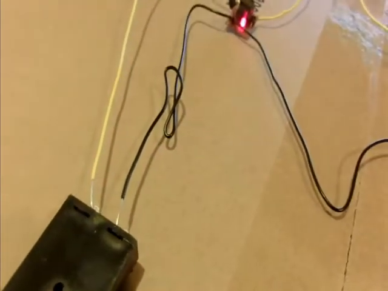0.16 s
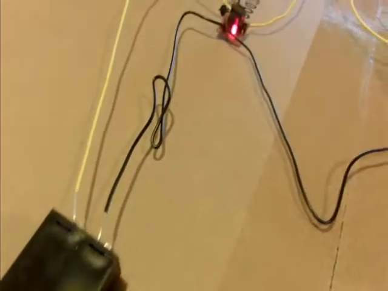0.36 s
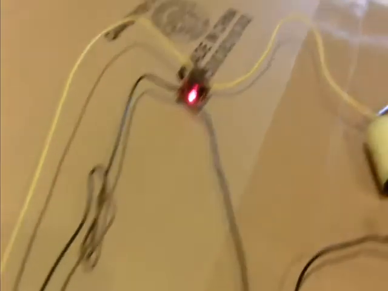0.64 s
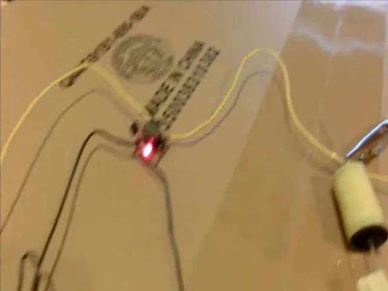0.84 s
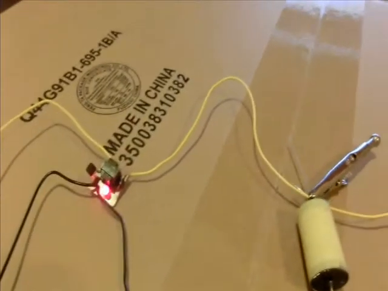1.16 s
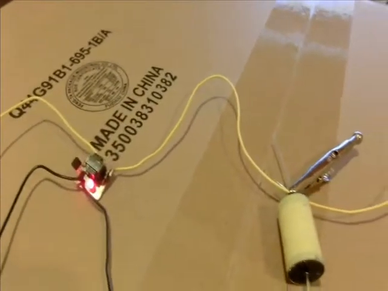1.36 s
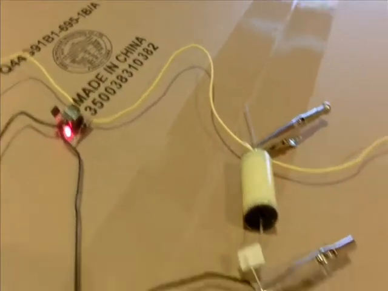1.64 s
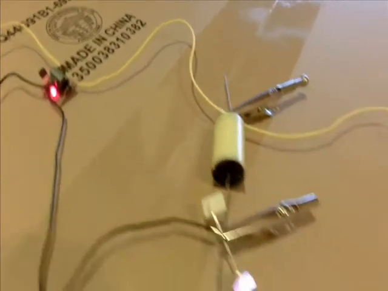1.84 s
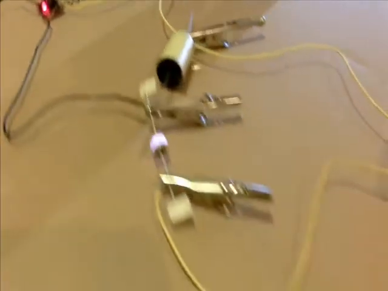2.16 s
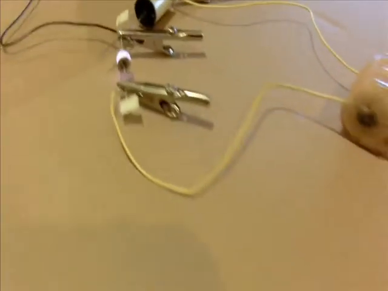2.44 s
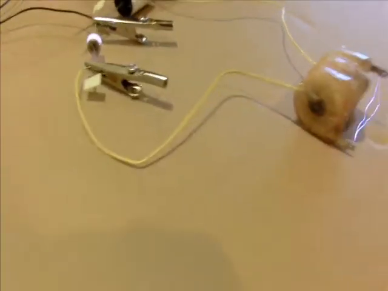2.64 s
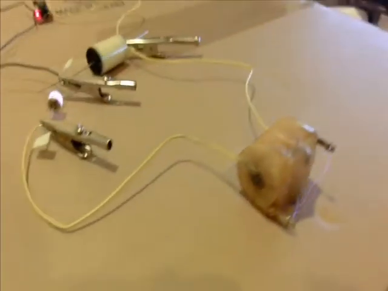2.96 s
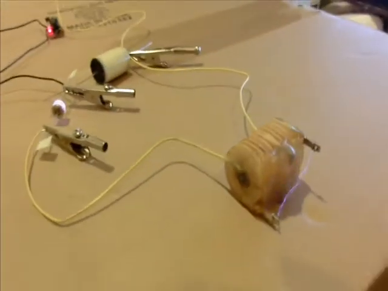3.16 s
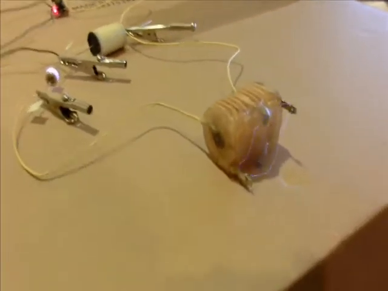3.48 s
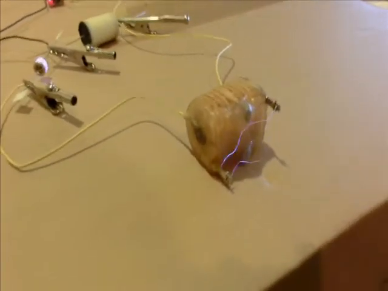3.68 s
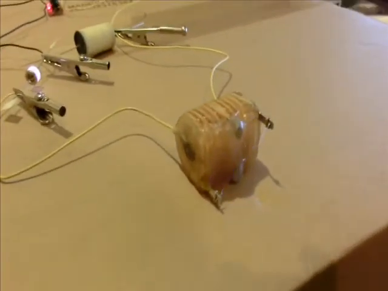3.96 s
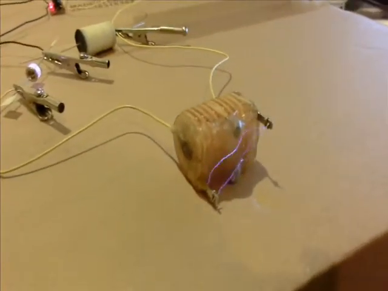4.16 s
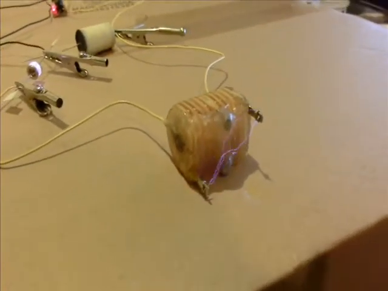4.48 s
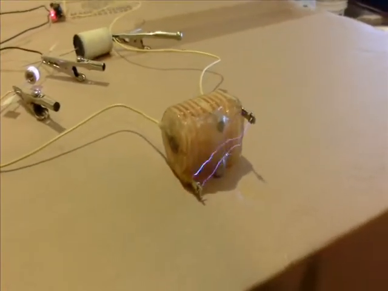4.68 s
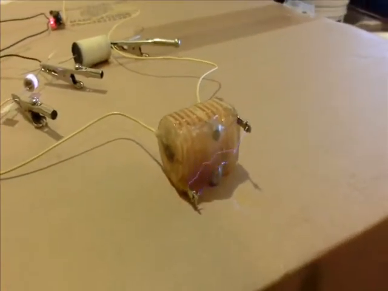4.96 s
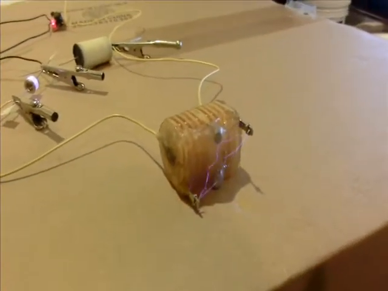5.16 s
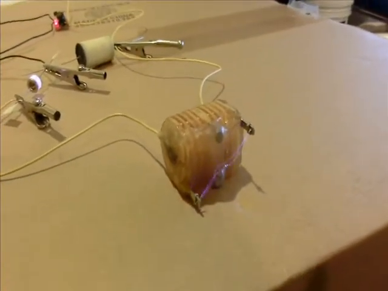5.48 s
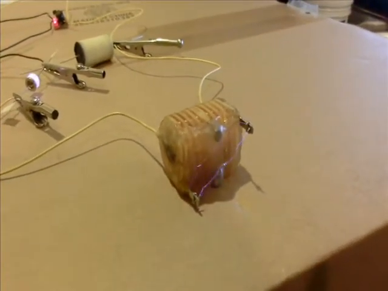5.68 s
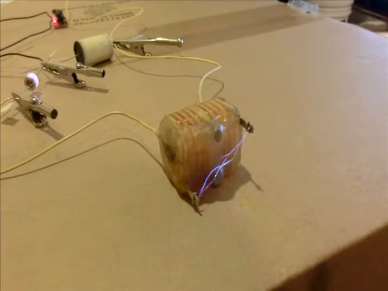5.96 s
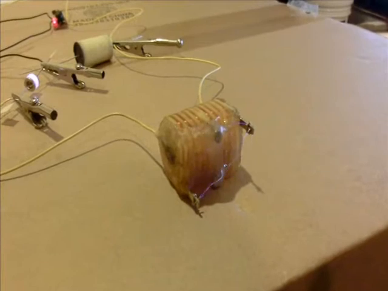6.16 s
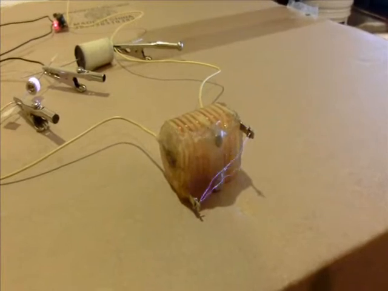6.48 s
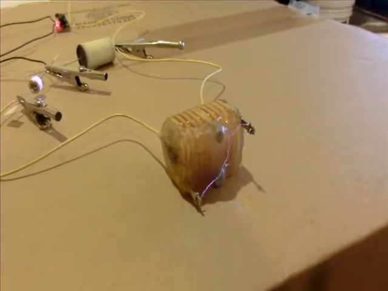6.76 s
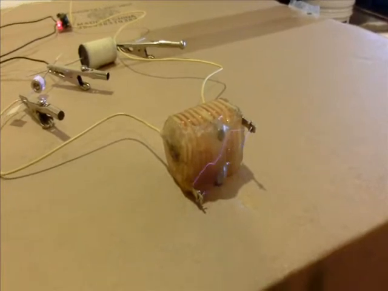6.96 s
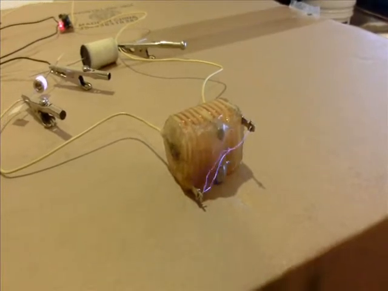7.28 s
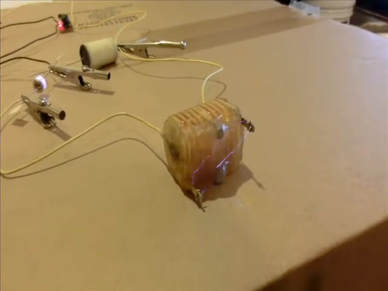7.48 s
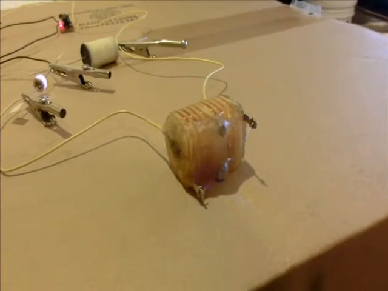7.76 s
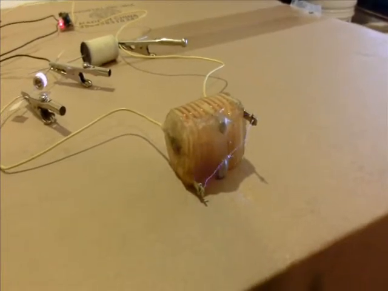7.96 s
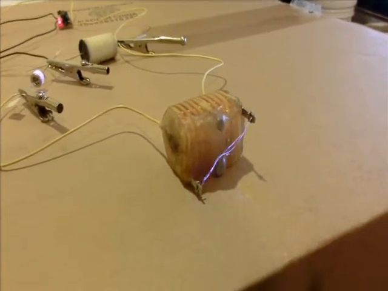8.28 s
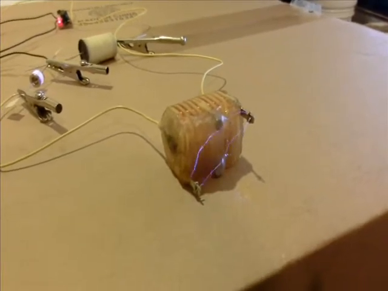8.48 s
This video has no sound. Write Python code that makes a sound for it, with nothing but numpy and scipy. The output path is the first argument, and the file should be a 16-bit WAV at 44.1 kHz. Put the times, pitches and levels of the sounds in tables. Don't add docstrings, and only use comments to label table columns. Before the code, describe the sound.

Handheld stereo phone close to a tabletop high-voltage circuit. From the first instant an electric arc rattles at roughly 110 cracks per second, coarse and loud with short reflections off hard walls. As the phone swings past the gap at about two seconds it grows momentarily stronger, then crisper and less echoey facing the coil. The buzz sags to around 94 per second, roughened by faltering sparks, stronger arcs and sharp snaps, and stops abruptly, still running.

```python
import sys
import numpy as np
from scipy import signal
from scipy.fft import rfft, irfft
from scipy.io import wavfile
from scipy.ndimage import uniform_filter1d

SR = 44100
rng = np.random.default_rng(int(sys.argv[2]) if len(sys.argv) > 2 else 0)


def store_pcm(level_fs):
    pcm = np.round(np.clip(level_fs, -1, 1) * 32767).astype(np.int16)
    wavfile.write(sys.argv[1], SR, np.atleast_2d(pcm).T)


def voltage_ratio(level):
    return 10 ** (np.asarray(level, float) / 20)


N = 380141

THUD_FOLLOWS = 0.3


def butter_filter(x, order, hz, kind):
    return signal.sosfilt(signal.butter(order, hz, kind, fs=SR, output="sos"), x)


def coloured(x, table, column):
    rows, size = np.array(table), 2048
    hz = np.maximum(np.arange(size // 2 + 1) * SR / size, 1)
    level_db = np.interp(np.log(hz), np.log(rows[:, 0]), rows[:, column])
    cepstrum = irfft(np.log(voltage_ratio(level_db)))
    cepstrum[1:size // 2] *= 2
    cepstrum[size // 2 + 1:] = 0
    return signal.oaconvolve(x, irfft(np.exp(rfft(cepstrum))))[:N]


def clicks(times, sizes):
    at = np.ravel(times)[:, None] * SR
    taps = np.floor(at).astype(int) + np.arange(-8, 9)
    shape = np.sinc(taps - at) * np.cos(np.pi * (taps - at) / 18) ** 2
    pulses = np.ravel(sizes)[:, None] * shape
    return np.bincount(np.clip(taps, 0, N).ravel(), pulses.ravel(), N + 1)[:N]


def dying_noise(train, t60_s):
    keep = voltage_ratio(-120 / (t60_s * SR))
    start = [np.mean(train[:SR // 10] ** 2) * keep]
    power = signal.lfilter([1 - keep], [1, -keep], train ** 2, zi=start)[0]
    return np.sqrt(power) * rng.standard_normal(N)


def room_floor():
    rumble = butter_filter(rng.standard_normal((2, N)), 2, [20, 220], "band")
    murmur = butter_filter(rng.standard_normal((2, N)), 2, [150, 600], "band")
    rumble = voltage_ratio(-74) * rumble / rumble.std() * voltage_ratio([[-5], [3]])
    return rumble + voltage_ratio(-66.5) * murmur / murmur.std()


def pickup(times, sizes):
    luck = np.clip(rng.standard_normal((len(times), 2)), -2.5, 2.5)
    even_sizes = sizes ** THUD_FOLLOWS
    jolt_sizes = even_sizes * voltage_ratio(-11.5 + 0.09 * times)
    left_luck = voltage_ratio(-27) * (0.18 * luck[:, 0] + luck[:, 1])
    jolts = [clicks(times - 0.0003, jolt_sizes * side) for side in (left_luck, luck[:, 0])]
    pull_late_s = -0.00013
    pull = clicks(times + pull_late_s, -even_sizes * voltage_ratio(-14 - times))
    pull = butter_filter(pull, 2, 750, "low") * voltage_ratio([[-5], [0]])
    return butter_filter(jolts, 2, 2110, "low") + pull


def room(train):
    t60_s, walls_share = 0.19, 0.42
    walls = rng.standard_normal(SR // 4) * voltage_ratio(-60 * np.arange(SR // 4) / SR / t60_s)
    walls[:SR // 300] = 0
    walls /= np.sqrt(np.sum(walls ** 2))
    lead_in = round(45 / RHYTHM[0][1] * SR)
    alike = signal.oaconvolve(np.r_[train[:lead_in], train], walls)[lead_in:lead_in + N]
    alike = butter_filter(alike, 2, 1300, "high")
    return np.sqrt(walls_share) * alike + np.sqrt(1 - walls_share) * dying_noise(train, t60_s)


# pitch_hz, left_db, right_db
ROOM_COLOUR = [(150, -47, -57), (400, -11, -2), (700, -6, -6.5), (1000, -16, -13.5), (1460, -13.5, -18),
               (2050, -12, -11.5), (2640, -16, -9), (3670, -17.5, -9), (4800, -17, -9.5),
               (5400, -12, -13.5), (6360, -11.5, -10.5), (7700, -12, -8), (8500, -16, -8),
               (10000, -28, -6.5), (11200, -27, -8), (12500, -24, -8.5), (14000, -24, -13),
               (14800, -40, -11), (15400, -48, -23), (16600, -60, -12)]


def room_tail(side, times, sizes):
    tail = coloured(room(clicks(times, sizes)), ROOM_COLOUR, side + 1)
    return butter_filter(tail, 2, 900, "high")


def smear(train, level_db):
    width_s = 0.0048
    bell = np.hanning(int(width_s * SR) + 3) ** 2
    power = np.convolve(train ** 2, bell / bell.sum(), "same")
    return voltage_ratio(level_db) * np.sqrt(power) * rng.standard_normal(N)


def clutter(side, crack):
    scatter = voltage_ratio(-12) * dying_noise(crack, 0.02) + smear(crack, (0, -8.5)[side])
    return butter_filter(scatter, 2, (2800, 2600)[side], "high")


# delay_side_on_ms, delay_facing_ms, left_db, right_db, fade_db_per_pose_step
MIRRORS = [(.9, 1.3, -13, -7, -5), (1.55, 2.3, -16, -9, -6), (2.95, 3.06, -17, -6.5, -3.5),
           (7.5, 7.8, -20, -8, -5.5)]


def mirrored(side, times, sizes, pose):
    echoes = np.zeros(N)
    for side_on_ms, facing_ms, *level_db, fade_db in MIRRORS:
        delay_s = (side_on_ms + (facing_ms - side_on_ms) * pose / 2) / 1000
        echoes += clicks(times + delay_s, sizes * voltage_ratio(level_db[side] + fade_db * pose))
    return echoes


# time_s, pose (0 side-on, 1 passing, 2 facing), direct_db, room_db
PHONE_PATH = [(0, 0.045, 4, 1.5), (0.7, 0.05, 4.5, 0.5), (1.2, 0.056, 6, 0.5), (1.7, 0.14, 4.5, -1.5),
              (2.05, 0.23, 4, -3), (2.2, 0.65, 8.5, -2), (2.6, 1.11, 6.5, -6.5), (3.1, 1.36, 4, -9.5),
              (3.4, 1.63, 0.5, -10.5), (3.9, 1.85, -2.5, -12), (4.4, 2, -2, -9.5), (5.3, 1.93, -2.5, -12),
              (6.2, 1.89, -3, -12), (7.4, 2.13, -3.5, -13.5), (8.62, 2.2, -3, -13.5)]


def heard_by(side, mic, lag_ms, times, sizes, evened):
    path_s, *columns = np.transpose(PHONE_PATH)
    pose, direct_db, room_db = [np.interp(times, path_s, column) for column in columns]
    pose = np.clip(pose, 0, 2)
    times = times + lag_ms / 1000
    near = np.zeros(N)
    for k in range(3):
        share = np.clip(1 - np.abs(pose - k), 0, 1) * sizes * voltage_ratio(direct_db)
        crack = clicks(times, share)
        thud = signal.lfilter(*signal.butter(1, 2600, fs=SR), clicks(times, share * (evened - 1)))
        sound = crack + thud + clutter(side, crack) + mirrored(side, times, share, pose)
        near += coloured(sound, mic, k + 1)
    notch_hz, notch_width_hz = 12500, 300
    notched = signal.lfilter(*signal.iirnotch(notch_hz, notch_hz / notch_width_hz, SR), near)
    near += 0.65 * (notched - near)
    return near + room_tail(side, times, sizes * voltage_ratio(room_db + 7))


def long_port(x, hz, width_hz):
    r = np.exp(-np.pi * width_hz / SR)
    poles = [1, -2 * r * np.cos(2 * np.pi * hz / SR), r * r]
    return signal.lfilter(poles[::-1], poles, x)


# pitch_hz, side_on_db, passing_db, facing_db
LEFT_COLOUR = [(89, -19, -25, -21), (525, -14.5, -21, -19.5), (580, -9, -13.5, -9.5),
               (702, -10, -14.5, -12.5), (805, -2, -18, -14), (854, -0.5, -8, -6.5), (1010, -7, -13, -4.5),
               (1136, -4.5, -13.5, -4.5), (1350, -9, -15.5, -9.5), (2020, -3.5, -10.5, -7),
               (2710, -11.5, -14, -10.5), (3780, -19.5, -18.5, -27), (4900, -23, -7.5, -2.5),
               (5340, -29, -13, -14.5), (5770, -21, -24, 0.5), (6440, -13, -22, -4.5),
               (7060, -14, -10, -10), (8700, -16, -22, -8.5), (10000, -15.5, -15, -12),
               (11300, -15, -23, -12), (12500, -20, -16, -10.5), (13900, -30, -23, -17.5),
               (15000, -42, -38, -19), (16300, -62, -64, -25)]


def left_microphone(cluster, evened):
    sound = heard_by(0, LEFT_COLOUR, -0.31, *cluster, evened)
    sound = signal.lfilter(*signal.butter(2, 594, "high", fs=SR), sound)
    return long_port(sound, hz=1575, width_hz=2180)


# pitch_hz, side_on_db, passing_db, facing_db
RIGHT_COLOUR = [(101, -77, -75, -52), (360, -26, -30, -25), (840, -16.5, -33, -30), (1460, -19.5, -35, -15),
                (1880, -16.5, -13.5, -14), (2260, -6.5, -17, -8), (3240, -8.5, -13, -5),
                (3920, -8, -8.5, 0), (4500, -16.5, -5, -1.5), (5230, -13.5, -9.5, -1), (5400, -14, -6, -2),
                (5770, -10.5, -8.5, -6), (6360, -8, -10.5, -2.5), (7800, -10.5, -16, -5),
                (9360, -9.5, -10, -6), (10870, -7, -5.5, 2.5), (12400, -5.5, -6.5, 4),
                (13400, -8, -6.5, 3.5), (15100, -8, -9, 3.5), (15500, -22, -18, -5), (15850, -50, -38, -20),
                (16550, -70, -60, -28)]


def right_microphone(cluster, evened):
    sound = heard_by(1, RIGHT_COLOUR, -0.26, *cluster, evened)
    return long_port(sound, hz=2156, width_hz=1870)


def arc(times, sizes, length_ms, kink_db, count=4):
    luck = rng.random((len(times), 2, count))
    trailing = np.arange(count) > 0
    lags_s = length_ms / 1000 * luck[:, 0] * trailing
    shares = voltage_ratio((kink_db - 12 * luck[:, 1]) * trailing)
    shares = shares / np.sqrt(np.sum(shares ** 1, axis=1, keepdims=True))
    return times[:, None] + lags_s, sizes[:, None] * shares


# time_s, sparks_per_s
RHYTHM = [(0.0, 109.49), (0.146, 108.43), (0.292, 108.99), (0.438, 109.9), (0.584, 108.63), (0.731, 107.39),
          (0.877, 106.9), (1.023, 107.08), (1.169, 105.98), (1.315, 105.45), (1.461, 106.14),
          (1.607, 103.93), (1.753, 103.91), (1.899, 105.04), (2.045, 103.72), (2.192, 103.45),
          (2.338, 103.6), (2.484, 103.45), (2.63, 101.39), (2.776, 102.92), (2.922, 104.1), (3.068, 100.51),
          (3.214, 102.2), (3.36, 101.21), (3.506, 101.73), (3.653, 100.23), (3.799, 99.79), (3.945, 100.48),
          (4.091, 100.11), (4.237, 100.42), (4.383, 99.66), (4.529, 97.9), (4.675, 99.39), (4.821, 98.47),
          (4.967, 97.5), (5.114, 99.21), (5.26, 97.49), (5.406, 97.77), (5.552, 97.92), (5.698, 97.78),
          (5.844, 98.06), (5.99, 98.38), (6.136, 97.13), (6.282, 97.4), (6.428, 95.74), (6.575, 96.49),
          (6.721, 94.79), (6.867, 95.76), (7.013, 96.46), (7.159, 97.49), (7.305, 95.77), (7.451, 96.43),
          (7.597, 95.82), (7.743, 97.66), (7.889, 95.72), (8.036, 96.89), (8.182, 95.04), (8.328, 94.55),
          (8.474, 95.84), (8.62, 93.83)]
# time_s, level_db (against the usual spark)
ODD_SPARKS = [(0.207, -5.5), (0.305, -5.5), (0.334, -6.0), (0.39, -6.5), (0.665, -6.0), (1.526, -5.0),
              (2.076, -5.0), (2.384, -7.0), (2.716, -7.0), (2.794, -6.0), (2.813, -5.0), (3.007, -6.5),
              (3.036, -5.5), (3.066, -6.0), (3.076, -5.0), (3.4, -5.5), (3.41, -5.5), (3.5, -5.0),
              (3.948, -5.0), (3.968, -8.0), (4.107, -8.5), (4.127, -6.0), (4.691, -5.0), (4.751, -6.5),
              (4.893, -6.0), (4.914, -6.0), (4.975, -6.0), (5.026, -8.5), (5.087, -5.5), (5.239, -6.0),
              (5.3, -6.5), (5.311, -5.5), (5.372, -7.0), (5.781, -5.0), (5.935, -7.0), (5.945, -6.0),
              (6.159, -8.5), (6.231, -5.0), (6.293, -5.5), (6.49, -5.5), (6.594, -5.0), (6.604, -11.0),
              (6.793, -5.0), (6.887, -5.5), (6.898, -6.5), (6.96, -6.5), (6.991, -6.0), (7.064, -5.5),
              (7.074, -5.0), (7.187, -6.5), (7.571, -6.0), (7.686, -5.0), (7.83, -7.0), (7.84, -10.0),
              (7.944, -6.0), (7.996, -5.0), (8.027, -6.0), (8.111, -6.5), (8.353, -6.0), (8.415, -10.0),
              (0.114, 2.5), (0.298, 2.5), (0.417, 2.5), (0.563, 2.0), (0.59, 2.5), (0.757, 3.0),
             (0.785, 2.5), (0.823, 2.0), (1.443, 2.0), (1.5, 2.0), (1.557, 2.5), (1.595, 2.5), (1.931, 2.5),
             (2.066, 2.5), (2.085, 2.0), (2.336, 2.5), (2.5, 2.5), (2.559, 3.0), (2.774, 2.5), (2.861, 2.5),
             (2.91, 2.5), (3.125, 2.0), (3.203, 2.0), (3.381, 2.5), (3.46, 2.0), (3.588, 2.0), (3.627, 2.0),
             (3.688, 2.0), (3.758, 2.5), (3.787, 2.5), (3.918, 3.0), (3.997, 2.0), (4.017, 3.0),
             (4.227, 3.0), (4.246, 2.5), (4.346, 2.0), (4.579, 2.5), (4.65, 2.0), (4.883, 2.5), (5.75, 3.0),
             (5.771, 2.5), (5.924, 2.5), (5.975, 2.0), (6.067, 2.0), (6.097, 2.5), (6.107, 3.0),
             (6.21, 2.5), (6.835, 3.0), (7.002, 2.5), (7.146, 2.5), (7.177, 2.5), (7.218, 2.0), (7.52, 3.0),
             (7.561, 3.0), (7.655, 2.5), (7.727, 3.0), (7.768, 2.5), (8.152, 2.5), (8.236, 2.0),
             (8.247, 2.0),
              (0.068, -4.0), (0.094, -4.5), (0.197, -4.0), (0.316, -4.0), (0.362, -3.5), (0.38, -4.5),
           (0.399, -4.5), (0.407, -5.0), (0.454, -3.5), (0.517, -4.0), (0.655, -3.5), (0.693, -4.5),
           (0.942, -4.0), (1.29, -4.5), (1.311, -4.5), (1.32, -3.5), (1.653, -3.5), (1.663, -3.5),
           (1.682, -4.0), (1.884, -4.5), (1.96, -3.5), (2.152, -4.5), (2.191, -5.0), (2.317, -4.0),
           (2.433, -4.5), (2.471, -3.5), (2.745, -3.5), (2.784, -4.0), (2.958, -4.0), (2.967, -3.5),
           (3.115, -4.0), (3.837, -4.5), (3.938, -3.5), (3.977, -3.5), (3.987, -3.5), (4.077, -4.0),
           (4.377, -4.0), (5.077, -4.0), (5.29, -3.5), (5.383, -3.5), (5.587, -4.5), (5.648, -4.5),
           (5.893, -4.5), (6.076, -4.0), (6.149, -5.0), (6.313, -4.0), (7.094, -4.0), (7.156, -4.0),
           (7.364, -4.5), (7.385, -3.5), (7.447, -3.5), (7.478, -4.0), (7.613, -4.5), (7.778, -3.5),
           (7.809, -4.0), (7.882, -4.5), (7.965, -4.0), (7.975, -3.5), (8.142, -3.5), (8.162, -4.0),
              (0.343, 4.0), (0.49, 3.5), (1.197, 3.0), (1.634, 3.5), (1.769, 4.0), (1.778, 4.5), (1.817, 3.5),
         (1.864, 4.0), (2.018, 4.0), (2.047, 4.0), (2.172, 4.5), (2.578, 3.5), (2.676, 3.0), (2.938, 4.5),
         (2.948, 3.0), (3.698, 3.5), (3.807, 3.0), (3.958, 3.5), (4.067, 3.0), (4.087, 3.0), (4.903, 3.0),
         (5.117, 5.0), (5.331, 3.5), (5.566, 3.5), (5.658, 3.0), (5.669, 4.0), (5.812, 3.0), (6.005, 3.0),
         (6.036, 3.5), (6.117, 4.0), (6.251, 4.0), (6.272, 3.5), (7.115, 3.5), (7.125, 3.0), (7.581, 4.0),
         (7.645, 4.5), (7.819, 5.0), (8.017, 3.5), (8.079, 3.5), (8.289, 3.0),
              (7.043, 4),
    (7.178, 4.5),
]


def sparks(jitter_ms, spread_db):
    s = np.arange(N) / SR
    fired = np.cumsum(np.interp(s, *np.transpose(RHYTHM))) / SR
    first_spark_s = 0.0039
    fired -= np.interp(first_spark_s, s, fired)
    times = np.interp(np.arange(int(fired[-1]) + 1), fired, s)
    luck, path = rng.standard_normal((len(times), 2)), rng.random((len(times), 2))
    times = times + jitter_ms / 1000 * signal.lfilter([1], [1, -0.5], luck[:, 0])
    short_path_share, short_path_db = 0.08, -1.5
    short_path = path[:, 1] < short_path_share
    level_db = spread_db * luck[:, 1] - short_path_db * np.log(path[:, 0]) * short_path
    odd_s, odd_db = np.transpose(ODD_SPARKS)
    nearest = np.abs(times - odd_s[:, None]).argmin(axis=1)
    level_db[nearest] = 0.87 * odd_db
    return times, voltage_ratio(level_db)


def scene():
    times, sizes = sparks(jitter_ms=0.14, spread_db=1.2)
    cluster = arc(times, sizes, length_ms=0.24, kink_db=-10)
    evened = sizes[:, None] ** (THUD_FOLLOWS - 1)
    microphones = [left_microphone(cluster, evened), right_microphone(cluster, evened)]
    return np.array(microphones) + pickup(times, sizes) + room_floor()


# start_s, length_s
TOP_SPELLS = [(3.94, .07), (4.13, .05), (4.38, .03), (4.56, .04), (4.63, .04), (4.88, .07), (5.07, .06),
              (5.2, .07), (5.3, .04), (5.37, .04), (5.48, .1), (5.65, .03), (5.74, .07), (5.93, .06),
              (6.02, .1), (6.23, .18), (6.6, .03), (6.74, .07), (6.94, .08), (7.06, .14), (7.39, .38),
              (7.8, .23), (8.1, .09), (8.22, .05), (8.33, .06), (8.55, .07)]


def cut_top(x):
    narrow, wide = [signal.sosfilt(signal.ellip(10, 0.5, 70, hz, fs=SR, output="sos"), x)
                    for hz in (15900, 16600)]
    s = np.arange(N) / SR
    kept = sum((s > start) & (s < start + length) for start, length in TOP_SPELLS)
    opened = uniform_filter1d(1. * (kept > 0), size=200)
    return narrow + opened * (wide - narrow)


# start_s, length_s, pitch_hz
DROPOUTS = [(.18, .03, 6050), (.65, .03, 2150), (.81, .03, 2250), (.84, .07, 2990), (1.0, .03, 2970),
            (1.025, .035, 2000), (1.1, .28, 2970), (1.51, .08, 2980), (1.53, .04, 2200), (1.62, .05, 2980),
            (1.67, .03, 2180), (1.88, .04, 3000)]


def drop_bands(x):
    centre, lost, s = x.mean(axis=0), np.zeros(N), np.arange(N) / SR
    half_width_hz, fade_s = 125, 0.01
    for start, length, hz in DROPOUTS:
        end = start + length
        near = slice(max(int((start - 0.05) * SR), 0), int((end + 0.05) * SR))
        band = signal.butter(3, [hz - half_width_hz, hz + half_width_hz], "band", fs=SR, output="sos")
        gate = np.interp(s[near], [start - fade_s, start, end, end + fade_s], [0, 1, 1, 0])
        lost[near] += gate * signal.sosfiltfilt(band, centre[near])
    return x - lost


def roll_off(x):
    return signal.sosfilt(signal.butter(12, 16640, fs=SR, output="sos"), x)


def record(dry):
    mix = drop_bands(cut_top(dry))
    return roll_off(mix)


dry = scene()
out = record(dry)
store_pcm(out)
```